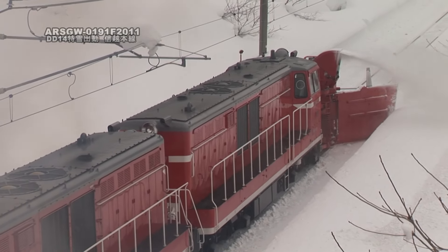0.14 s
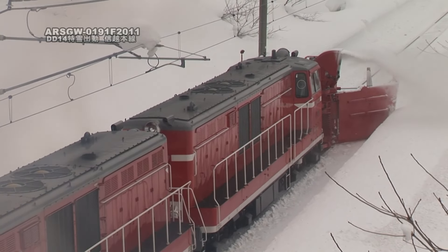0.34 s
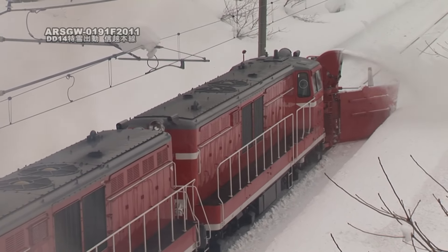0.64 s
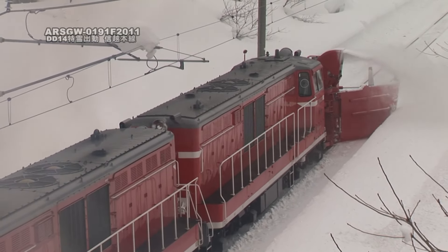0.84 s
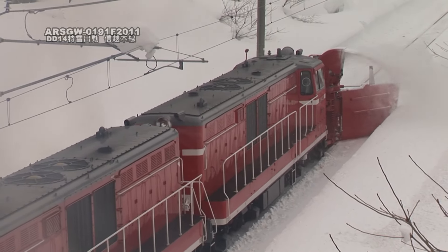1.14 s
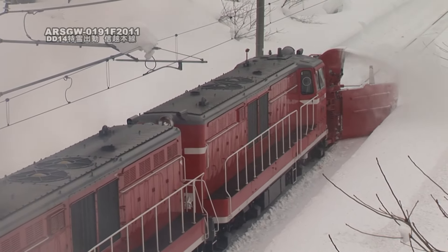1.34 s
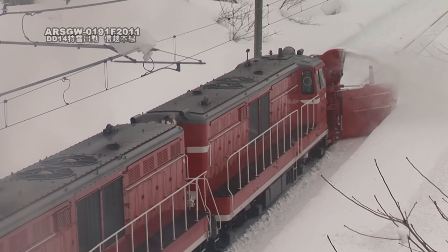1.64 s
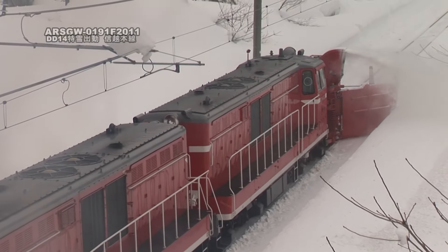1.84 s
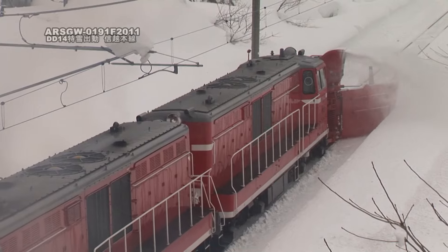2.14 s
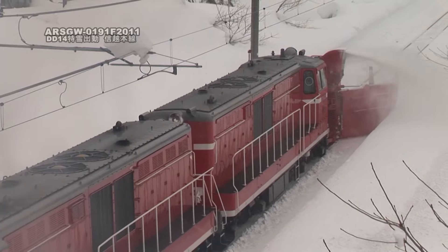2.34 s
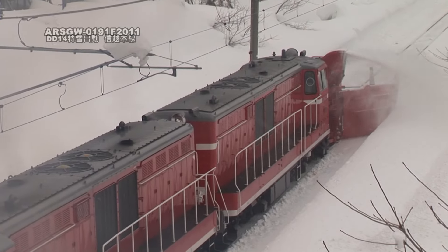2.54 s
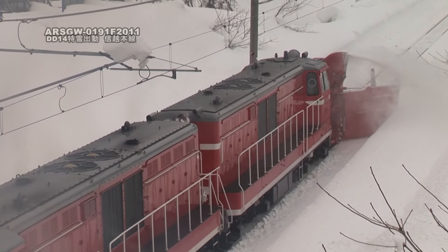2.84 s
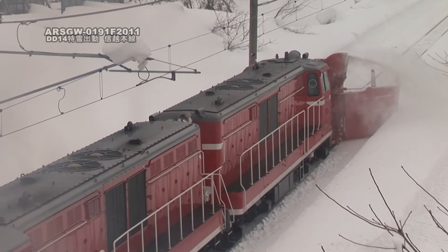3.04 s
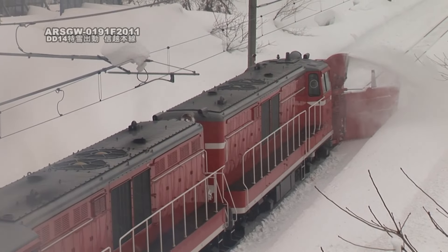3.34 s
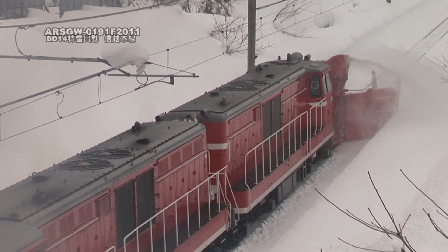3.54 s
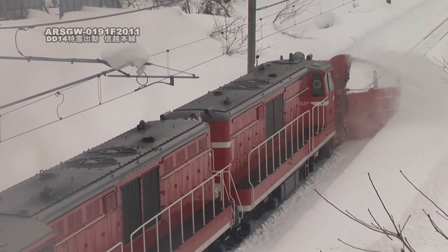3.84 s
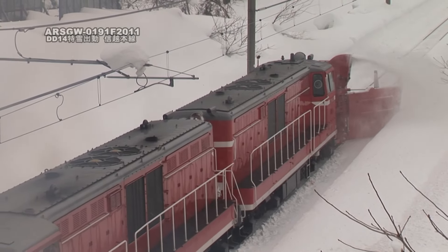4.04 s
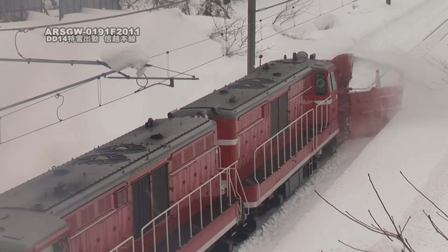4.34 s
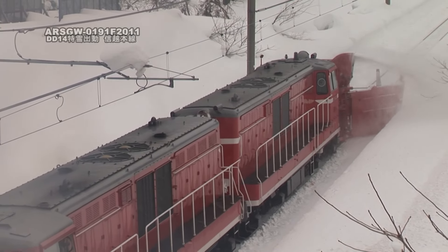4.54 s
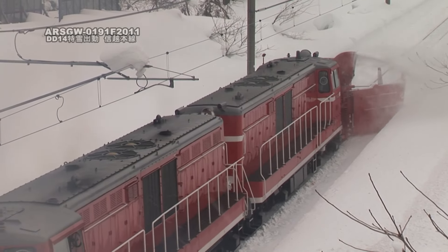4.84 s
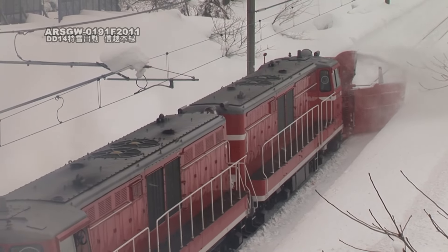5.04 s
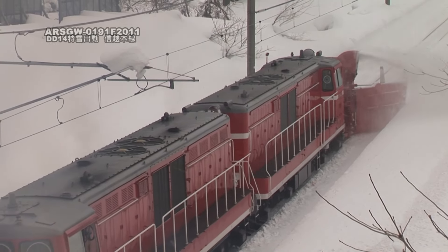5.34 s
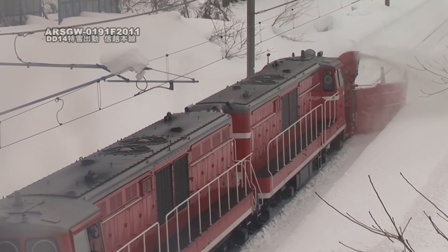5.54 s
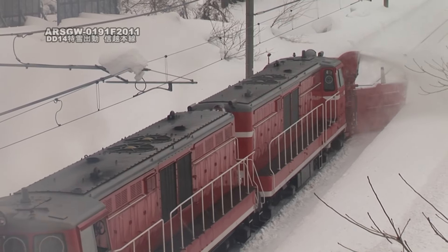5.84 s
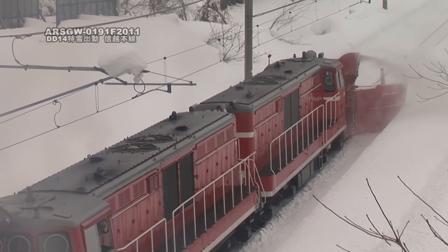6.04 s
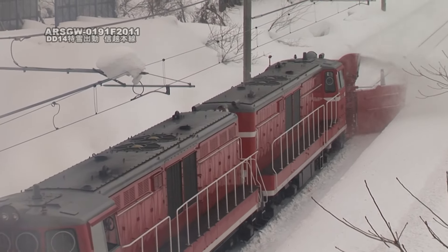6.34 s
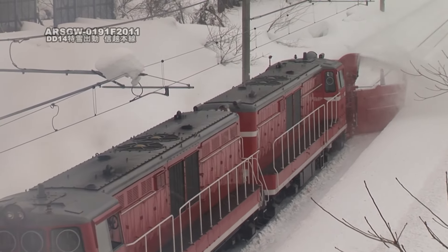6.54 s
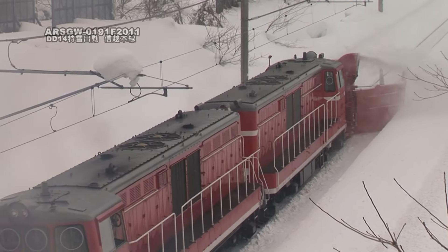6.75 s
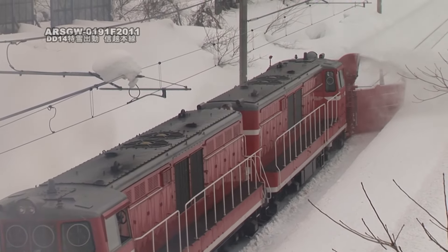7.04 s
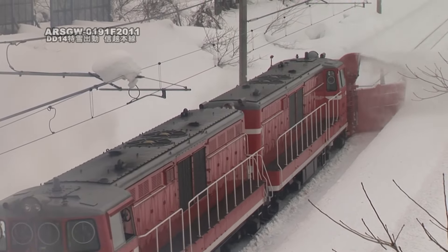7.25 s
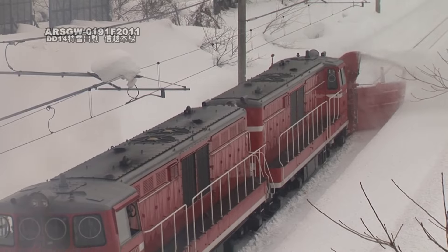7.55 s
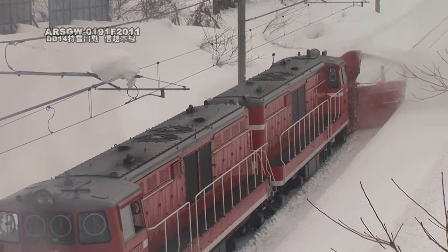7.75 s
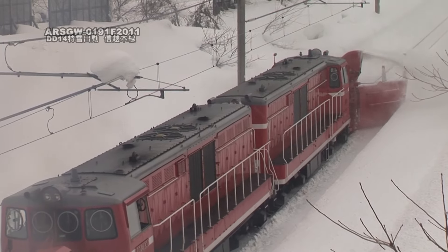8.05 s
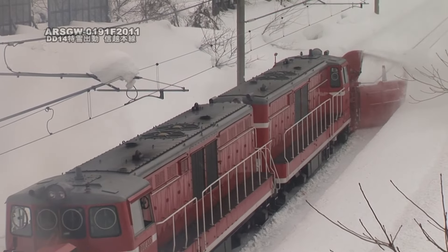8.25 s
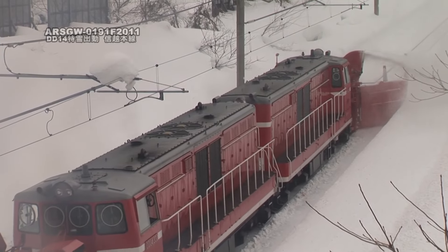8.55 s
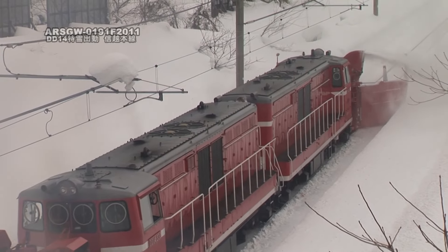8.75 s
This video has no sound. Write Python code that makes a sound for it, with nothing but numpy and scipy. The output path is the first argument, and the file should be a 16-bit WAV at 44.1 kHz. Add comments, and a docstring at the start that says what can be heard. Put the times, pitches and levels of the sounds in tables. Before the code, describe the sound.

Two diesel locomotives and a rotary snow blower run throughout, heard outdoors from a slope above. The engines drone with a slow beat, the rotor chugs about six times a second with occasional low thumps, and whirring machinery roars under a high, rough whine and the rush of thrown snow. Close on the left, a camera shutter clicks three times in the first 0.6 seconds, then in pairs at about 2.1, 2.7 and 5.2 seconds. A second camera on the right takes single shots near 1.5, 2.5, 3.6 and 4.8 seconds. From about 1.4 seconds, icy flakes land near the microphone as sparse, dry ticks over a faint powdery hiss. The train gradually becomes a little quieter as it draws away, still working, and the left camera fires a final pair at around 8.2 seconds.

```python
"""Two diesel locomotives push a rotary snow blower along a cutting, heard from a slope above.
From the start the engines, at almost the same speed, beat slowly; the rotor chugs, the machinery
whines, thrown snow rushes, and a still camera close on the left fires its shutter. After a second,
large icy flakes begin to tick on the gear, and a camera on the right joins in for four shots.
The train draws slowly away; near the end the left camera fires a last pair of shots."""
import sys
import numpy as np
from scipy import signal
from scipy.fft import rfft, irfft
from scipy.io import wavfile

SR = 44100
rng = np.random.default_rng(int(sys.argv[2]) if len(sys.argv) > 2 else 0)


def generate_wav(sig):
    """Save sig (samples, or channels by samples) to the path in sys.argv[1] as 16-bit PCM at SR."""
    pcm = np.round(np.clip(np.atleast_2d(sig).T, -1, 1) * 32767).astype(np.int16)
    wavfile.write(sys.argv[1], SR, pcm)


N = 392049
T = np.arange(N) / SR
CYCLE_HZ, FANS_HZ = 13.042, (30.26, 33.23)
TURN_HZ, BLADE_HZ = 5.728, 22.912  # four blades a turn
GULP_HZ, FIRST_GULP_S = 5.81, 0.12  # the rotor takes snow in gulps
RECEDE_DB_PER_S = 0.47  # exhausts and blade knocks fade as the train draws away

# Table levels are relative: each source adds its own gain.
# spectra of powder hiss, flake ticks and flake snaps: frequency_hz, level_db
HISS_SPECTRUM = [(3000, -4), (6000, 5.5), (7200, -5.5), (8200, 2), (9000, -4.5), (11200, 3), (12300, -4),
                 (13600, 2.5), (14400, -16), (15500, -27)]
TICK_SPECTRUM = [(2000, -7), (5500, -13), (7000, -11), (9000, -7.5), (11000, 1), (13500, 1.5), (15000, -3),
                 (16000, -16)]
SNAP_SPECTRUM = [(1500, -10), (3500, -9), (4900, 5), (5700, -6), (7000, -20)]
# hiss of drifting powder: time_s, level_db
POWDER_LEVEL = [(0, -60), (.55, -60), (1.35, -64.5), (2.05, -63), (2.3, -59.5), (3.3, -62.5), (3.8, -60.5),
                (5.3, -64.5), (6.05, -62), (7.0, -63), (7.6, -67), (8.89, -65)]
# large flakes landing close by: start_s, tick_db, left_minus_right_db, snap_db
LARGE_FLAKES = [(1.3588, -42, 8, -51), (1.7634, -39, 6, -52), (1.8013, -41, 8.0, -51),
                (1.8803, -31.5, 9.5, -44), (2.4733, -40, 7.5, -48), (3.1926, -27, 12, -48),
                (4.145, -35, 0.5, -45), (4.2906, -35, 4.5, -44), (4.5655, -33, 8.0, -40),
                (5.7402, -32, 11, -41), (5.8514, -36, 10, -42), (6.0906, -40, 3, -51),
                (6.8229, -30.5, -9, -37), (7.223, -38, 2.5, -49), (7.5864, -43, -11, -54),
                (7.9236, -26.5, -6, -51), (7.9994, -33, 4.5, -50), (8.806, -32, 9.0, -34)]
# shutter releases of each camera: start_s
LEFT_RELEASES = [.028, 0.357, .555, 2.082, 2.278, 2.721, 2.919, 5.24, 5.436, 8.17, 8.368]
RIGHT_RELEASES = [1.515, 2.513, 3.552, 4.758]
# mirror and curtain blows of one release: delay_s, level_db, rise_s, decay_s
LEFT_IMPACTS = [(0, -33.5, 0.00057, 0.0065), (.0085, -58, .0004, .0012), (0.0248, -37, .0008, 0.0027),
                (0.04, -34.5, 0.0038, 0.0075), (.046, -34.5, .002, 0.012), (0.063, -31.5, 0.0039, 0.0036),
                (.067, -34.5, 0.0017, 0.0089), (0.087, -36.5, .003, 0.0085), (.1, -46, .001, .003)]
RIGHT_IMPACTS = [(0, -34, 0.0013, 0.0047), (.013, -32.5, .001, 0.0053), (.052, -33.5, 0.0023, 0.0049),
                 (.071, -40, .001, 0.0043), (.081, -27, 0.0031, 0.0044), (.141, -38.5, .0005, 0.0017)]
# response of each camera body: frequency_hz, level_db
LEFT_SPECTRUM = [(500, -14), (1200, 0), (2200, 2), (3300, -1.5), (4500, -4.5), (5500, -0.5), (6900, -11.5),
                 (8400, -10), (10200, -9.5), (11800, -4.5), (13700, -8), (15000, -11), (16000, -28)]
RIGHT_SPECTRUM = [(600, -20), (1500, 0), (3300, -10), (4700, -1.5), (5900, -9), (6700, -15), (8200, -8.5),
                  (9500, -12), (11000, -6.5), (13300, -4.5), (15200, -5), (16200, -18)]
# how hard the plough works: time_s, roar_db, whine_db
PLOUGH_EFFORT = [(0, -31.5, -30.5), (0.4, -31.0, -29.5), (0.8, -31, -32.5), (1.3, -32.5, -34.5),
                 (1.75, -35.5, -34), (2.3, -32.0, -31.5), (3.1, -31, -32.5), (3.65, -32.5, -32),
                 (3.95, -31.5, -34.5), (4.35, -33.5, -33.0), (5.05, -35.5, -35.5), (5.7, -34.0, -34.0),
                 (5.95, -34.5, -32), (6.2, -34.5, -35.0), (6.9, -33, -34.5), (7.6, -37.5, -37.0),
                 (8.3, -34.5, -35), (8.89, -34.0, -34)]
# spectra of the machinery and blower: frequency_hz, level_db
ROAR_SPECTRUM = [(150, -16), (300, -5), (420, 1), (560, 1), (720, 0), (880, -2), (990, -14.5), (1075, 4.5),
                 (1240, 5), (1320, -0.5), (1420, -10.5), (1700, -7.5), (2000, -4), (3000, -20)]
WHINE_SPECTRUM = [(1400, -31), (1800, -17.5), (2150, -3.5), (2370, -2), (2530, -2), (2750, -6.5),
                  (3100, -11.5), (3750, -17), (4200, -24.5), (4500, -42)]
WHISTLE_SPECTRUM = [(4200, -25), (4500, -5.5), (4720, 2.5), (4850, 6), (5100, -1), (5400, -9.5),
                    (5770, -5.5), (6050, -33.5), (6600, -35), (7500, -35)]
# resonances of the gear case: centre_hz, width_hz, level_db
GEAR_MODES = [(1536, 25, -4), (1628, 64, -3), (1686, 49, -6)]
# gear whirr: time_s, level_db
GEAR_LEVEL = [(0, -41), (0.25, -36), (0.75, -42.5), (1.45, -45), (1.95, -37.5), (2.7, -38), (3.1, -42.0),
              (3.65, -35.5), (4.3, -37.5), (4.6, -41.5), (5.0, -46.5), (5.3, -40), (5.6, -44.0),
              (6.4, -42.5), (7.6, -47.5), (8.89, -42.5)]
# moments when the two engines fire in antiphase: time_s
ANTIPHASE_TIMES = [0, 1.33, 2.79, 4.28, 5.66, 7.06, 8.64, 10.1]
# strong exhaust harmonics: cycle_multiple, first_engine_db, second_engine_db
EXHAUST_LINES = [(3, -48, -76), (6, -34, -32), (7, -44, -49), (8, -61, -61.5), (9, -36, -50),
                 (10, -42, -64), (12, -63, -65), (15, -50.5, -46.5), (18, -54, -66), (20, -74, -64),
                 (24, -69, -61), (28, -55, -63), (32, -54.5, -72), (33, -59, -67), (36, -61.5, -67),
                 (40, -56, -55), (42, -49.5, -74.5), (48, -52.5, -70), (81.8, -52, -72)]
# rotor harmonics: turn_multiple, level_db
ROTOR_LINES = [(4, -62), (9, -51), (12, -45.5), (13, -56), (16, -51), (20, -43), (21, -50), (23, -50.5),
               (24, -41), (25, -43.5), (33, -49.5), (36, -52), (40, -50)]
# spectrum of snow rumbling in the housing: frequency_hz, level_db
RUMBLE_SPECTRUM = [(15, -42), (24, -21), (50, -21), (70, -17), (100, 0.5), (135, 1), (185, -1.5),
                   (230, -8.5), (280, -10.5), (350, -27), (600, -47)]
# how much snow the rotor holds: time_s, rumble_db
ROTOR_LOAD = [(0, -36.5), (1.15, -33), (2.3, -37), (3.1, -36.5), (3.6, -31.5), (4.3, -33.5), (5.4, -38),
              (6.5, -38.5), (7.4, -34), (8.1, -41), (8.89, -39)]
# blades striking lumps of packed snow: time_s, level_db
PACKED_LUMPS = [(.1, -13), (.147, -12.5), (.798, -13), (1.147, -10.5), (2.151, -14), (2.543, -10.5),
                (2.676, -14.5), (2.847, -14.5), (3.719, -15.5), (3.898, -12), (4.072, -15), (4.378, -14),
                (4.769, -12.5), (5.123, -17.5), (6.865, -15.5), (6.993, -14), (7.17, -15)]


def amp(db):
    """Amplitude ratio of a level in decibels."""
    return 10 ** (np.asarray(db) / 20)


def unit_rms(x):
    """Normalisation to an rms of one."""
    return x / np.sqrt(np.mean(x ** 2) + 1e-20)


def curve(rows, column=1):
    """Linear interpolation of a table column at every sample."""
    rows = np.asarray(rows)
    return np.interp(T, rows[:, 0], rows[:, column])


def coloured(x, spectrum):
    """Spectral shaping that conserves the power of white noise."""
    hz, db = np.transpose(spectrum)
    log_hz = np.log(np.fft.rfftfreq(N, 1 / SR) + 1)
    gain = amp(np.interp(log_hz, np.log(hz), db, left=db[0] - 12, right=db[-1] - 40))
    return irfft(rfft(x) * unit_rms(gain), N)


def drift(hz):
    """Random fluctuation of rms one, low-passed near hz."""
    f = np.fft.rfftfreq(N, 1 / SR)
    return unit_rms(irfft(rfft(rng.standard_normal(N)) * np.exp(-(f / hz) ** 2), N))


def wide_noise(side_db):
    """Partly coherent stereo noise: side_db sets the width."""
    mid, side = rng.standard_normal((2, N))
    return unit_rms(np.array([mid + amp(side_db) * side, mid - amp(side_db) * side]))


def panned(balance_db):
    """Left and right gains for a level difference."""
    return unit_rms(amp(np.array([[balance_db], [-balance_db]]) / 2))


def add(mix, start_s, sound):
    """Superposition of a sound on the mix."""
    part = mix[..., max(round(start_s * SR), 0):][..., :sound.shape[-1]]
    part += sound[..., :part.shape[-1]]


def periodic_wave(turns, multiples, db, phases, size=8192):
    """Fourier synthesis of one period, repeated every turn."""
    lines = np.zeros(size // 2 + 1, complex)
    lines[np.rint(multiples).astype(int)] = amp(db) * np.exp(2j * np.pi * phases) * size / np.sqrt(2)
    return np.interp(turns % 1 * size, np.arange(size), irfft(lines))


def air(level_db=-56):
    """Diffuse field: a faint rumble from all round, uncorrelated between the channels."""
    spectrum = [(12, 3), (30, 32), (75, -20), (130, -17), (300, -12)]
    return amp(level_db) * coloured(rng.standard_normal((2, N)), spectrum)


def powder():
    """Amplitude-modulated noise: blown snow makes a fine, grainy hiss."""
    grains = unit_rms(wide_noise(-0.85) * amp(1.5 * drift(400)))
    return coloured(grains, HISS_SPECTRUM) * amp(curve(POWDER_LEVEL))


def flakes(decay_s=0.00091, patter_per_s=6):
    """Damped impacts: flakes land as dry ticks, the large ones with a lower snap."""
    ticks, snaps = np.zeros((2, 2, N))
    fade = np.exp(-np.arange(400) / SR / decay_s)
    for start_s, tick_db, balance_db, snap_db in LARGE_FLAKES:
        add(ticks, start_s + 0.001, amp(tick_db - 1) * panned(balance_db) * fade)
        add(snaps, start_s + 0.00075, amp(snap_db + 6) * panned(balance_db) * fade)
    for when, weight, where in rng.random((int(patter_per_s * N / SR), 3)):
        add(ticks, when * N / SR, amp(-58 + 10 * weight ** 2) * panned(16 * (where - 0.5)) * fade)
    crisp = coloured(ticks * wide_noise(0), TICK_SPECTRUM)
    return crisp + coloured(snaps * wide_noise(0), SNAP_SPECTRUM)


def camera(releases, impacts, body, balance_db, lag_ms, side_db, rattle_db):
    """Impact excitation: mirror and curtain blows add in power and rattle the camera body."""
    t, power = np.arange(2200) / SR, np.zeros(N)
    for start_s in releases:
        for delay_s, db, rise_s, decay_s in impacts:
            shape = np.minimum(t / rise_s, 1) * np.exp(-np.maximum(t - rise_s, 0) / decay_s)
            add(power, start_s + delay_s, (amp(db + rng.standard_normal()) * shape) ** 2)
    rattle = unit_rms(wide_noise(side_db) * amp(rattle_db * drift(520)))
    left, right = coloured(rattle * np.sqrt(power), body)
    lag = np.exp(-2j * np.pi * np.fft.rfftfreq(N, 1 / SR) * lag_ms / 1000)
    return np.array([left, irfft(rfft(right) * lag, N)]) * panned(balance_db)


def fans(hum_db=-46, octave_db=-52, in_step_s=0.0692):
    """Beating: two cooling fans at slightly different speeds throb against each other."""
    phase = 2 * np.pi * np.outer(FANS_HZ, T - in_step_s)
    return np.sqrt(2) * (amp(hum_db) * np.cos(phase) + amp(octave_db) * np.sin(2 * phase)).sum(0)


def machinery():
    """Broadband noise: the machinery roars louder as the plough works harder."""
    roar = coloured(wide_noise(-12), ROAR_SPECTRUM)
    return roar * amp(curve(PLOUGH_EFFORT) - 3 + 0.5 * drift(6)) * panned(-0.74)


def gears(cycles, swell_db=2.6, clash_db=4.5, clash_s=0.0032, first_clash_s=0.0635):
    """Resonance: the gear case whirrs, swelling to a clash once an engine cycle."""
    f = np.fft.rfftfreq(N, 1 / SR)
    response = sum(amp(db) / (1 + 2 * ((f - hz) / width) ** 2) for hz, width, db in GEAR_MODES)
    whirr = irfft(rfft(wide_noise(-8)) * response, N)
    turn = (cycles - CYCLE_HZ * first_clash_s + 0.5) % 1 - 0.5
    clash = np.exp(-(turn / CYCLE_HZ / clash_s) ** 2)
    pulse = amp(swell_db * np.cos(2 * np.pi * turn) + clash_db * clash)
    return unit_rms(whirr * pulse) * amp(curve(GEAR_LEVEL) - 2.5)


def blower(flutter_db=0.81):
    """Band-limited noise: a rough whine, and above it a whistle that grows with the snow thrown."""
    roar_db, whine_db = curve(PLOUGH_EFFORT, 1), curve(PLOUGH_EFFORT, 2)
    whine = coloured(wide_noise(-21), WHINE_SPECTRUM) * amp(whine_db - 4.5 + flutter_db * drift(30))
    throw_db = (roar_db + whine_db) / 2
    whistle = coloured(wide_noise(-5), WHISTLE_SPECTRUM)
    return whine + whistle * amp(-58.5 + 1.5 * (throw_db - throw_db.mean()))


def chute(ring_hz=2405, rise_hz_per_s=3.5, wander_hz=28, width_hz=200):
    """Noise-driven resonance: rushing snow rings in the chute, wandering in pitch."""
    radius = np.exp(-np.pi * width_hz / SR)
    baseband = signal.lfilter([1], [1, -2 * radius, radius ** 2], wide_noise(-20) + 1j * wide_noise(-22))
    pitch_hz = ring_hz + rise_hz_per_s * T + wander_hz * drift(1.5)
    ring = unit_rms((baseband * np.exp(2j * np.pi * np.cumsum(pitch_hz) / SR)).real)
    whine_db = curve(PLOUGH_EFFORT, 2)
    return ring * amp(-42 + 1.23 * (whine_db - whine_db.mean()) + drift(7))


def engine_cycles():
    """Phase slip: cycles run by each engine as the second falls behind, six firings a bank per cycle."""
    slipped_firings = np.interp(T, ANTIPHASE_TIMES, np.arange(len(ANTIPHASE_TIMES)) + 0.5)
    return CYCLE_HZ * T, CYCLE_HZ * T - slipped_firings / 6


def exhausts(cycles, wobble_cycles=0.0028):
    """Interference: two exhausts with the same harmonic phases beat as the engines slip out of step."""
    strong, *levels = np.transpose(EXHAUST_LINES)
    multiples = np.arange(1, 100)
    phases, out = rng.random(len(multiples)), 0
    for turns, strong_db in zip(cycles, levels):
        db = -65 + 3 * rng.standard_normal(len(multiples))  # weak lines from unequal cylinders
        db -= 25 * np.exp(-multiples / 3)  # the stacks radiate little at the lowest orders
        db[np.rint(strong).astype(int) - 1] = strong_db
        out += periodic_wave(turns + wobble_cycles * drift(1.54), multiples, db, phases)
    return out * amp(1 - RECEDE_DB_PER_S * T)


def gulp(time_s):
    """Periodic loading: how full the rotor is, from -1 to 1."""
    return np.cos(2 * np.pi * GULP_HZ * (time_s - FIRST_GULP_S))


def rotor(gulp_db=3.5, wobble_turns=0.0031):
    """Rotational harmonics: the blades drone, while each gulp swells the rumble in the housing."""
    multiples, db = np.transpose(ROTOR_LINES)
    drone = periodic_wave(TURN_HZ * T + wobble_turns * drift(1.96), multiples, db, rng.random(len(db)))
    rumble = coloured(wide_noise(-31.5), RUMBLE_SPECTRUM) * unit_rms(amp(gulp_db * gulp(T)))
    return drone + rumble * amp(curve(ROTOR_LOAD) - 0.7)


def blade_knocks(gulp_db=7.5, ring_hz=138, rise_s=0.0029, decay_s=0.0074, jitter_s=0.0006):
    """Impulse train: each blade knocks on the snow, harder in a gulp; lumps boom in the housing."""
    t = np.arange(-400, 1200) / SR
    shape = np.where(t < 0, np.exp(-(t / rise_s) ** 2), 1 / np.cosh(2 * t / decay_s))
    times = np.arange(0.0121, N / SR, 1 / BLADE_HZ)
    strength, detune, late = rng.standard_normal((len(times), 3)).T
    levels_db = -26 + gulp_db * gulp(times) - RECEDE_DB_PER_S * times + 3 * strength
    for time_s, db in PACKED_LUMPS:
        levels_db[np.argmin(abs(times - time_s))] = db - 1.3
    knocks = np.zeros(N)
    for time_s, db, hz in zip(times + jitter_s * late, levels_db, ring_hz * np.exp(0.089 * detune)):
        add(knocks, time_s + t[0], -amp(db) * shape * np.cos(2 * np.pi * hz * t))
    highpass = signal.butter(2, 65, "high", fs=SR, output="sos")  # the open housing radiates no deep bass
    return signal.sosfiltfilt(highpass, knocks)


def scene():
    """Superposition: the train in the middle, cameras and flakes close on either side."""
    cycles = engine_cycles()
    train = exhausts(cycles) + fans() + rotor() + blade_knocks()
    train += machinery() + gears(cycles[1]) + blower() + chute()
    left = camera(LEFT_RELEASES, LEFT_IMPACTS, LEFT_SPECTRUM,
                  balance_db=4.5, lag_ms=0.076, side_db=-7.5, rattle_db=2.0)
    right = camera(RIGHT_RELEASES, RIGHT_IMPACTS, RIGHT_SPECTRUM,
                   balance_db=-8, lag_ms=-0.087, side_db=-4, rattle_db=1.9)
    return train + powder() + flakes() + air() + left + amp(-4) * right


def record(dry, cutoff_hz=16300):
    """Band limiting: a linear-phase low-pass removes the highest treble."""
    lowpass = signal.firwin(511, cutoff_hz, window=("kaiser", 9), fs=SR)
    return signal.oaconvolve(dry, lowpass[None], "same")


dry = scene()
out = record(dry)
generate_wav(out)
```